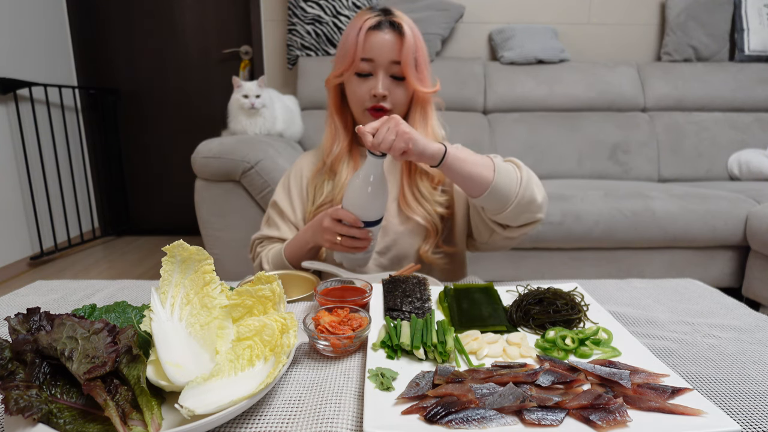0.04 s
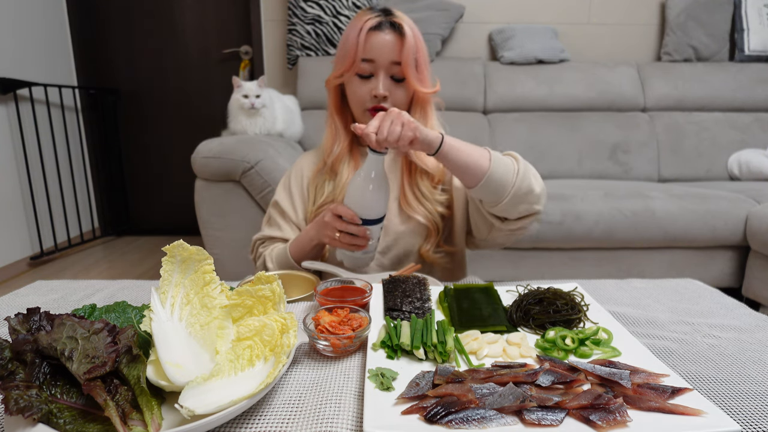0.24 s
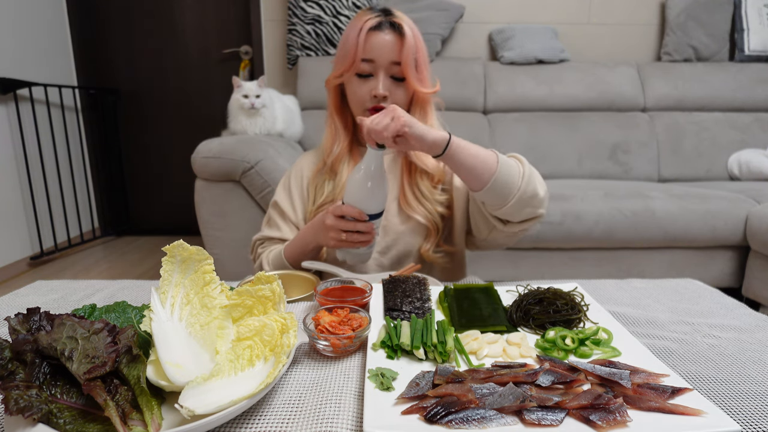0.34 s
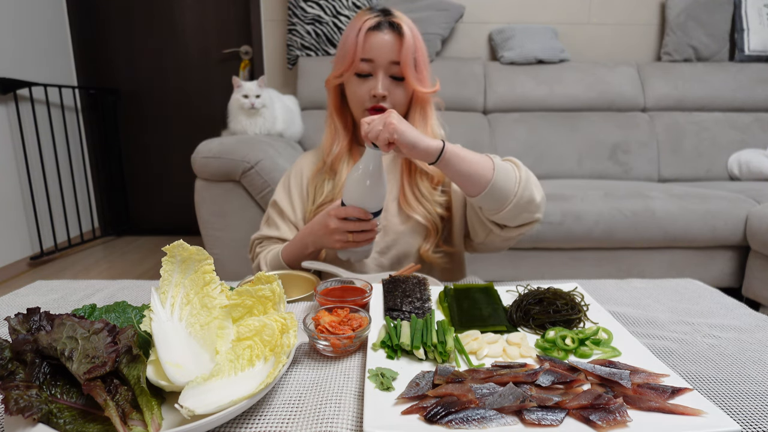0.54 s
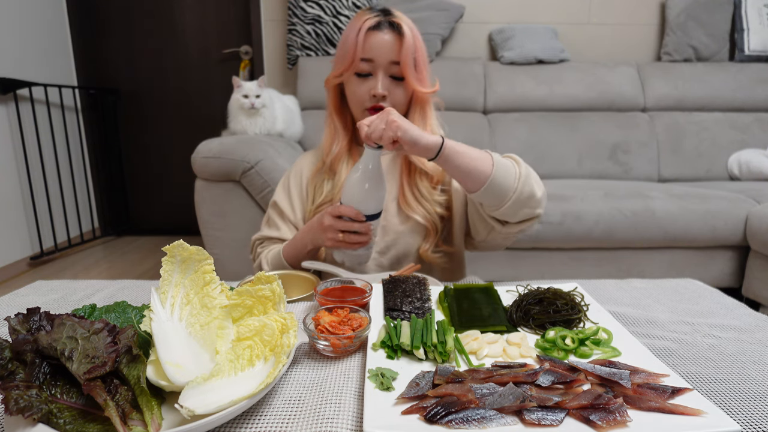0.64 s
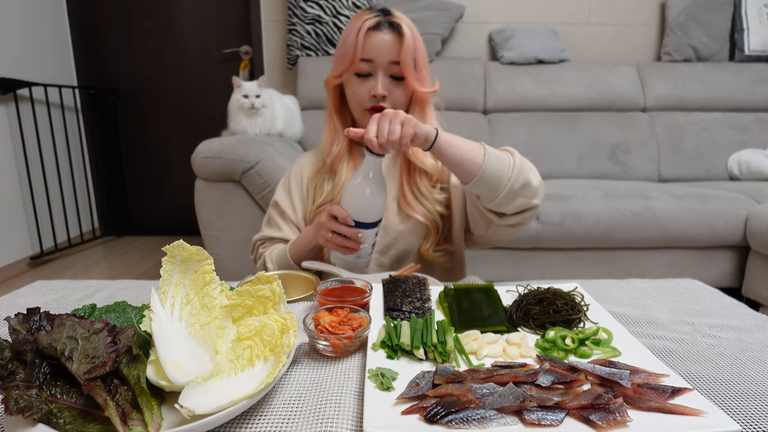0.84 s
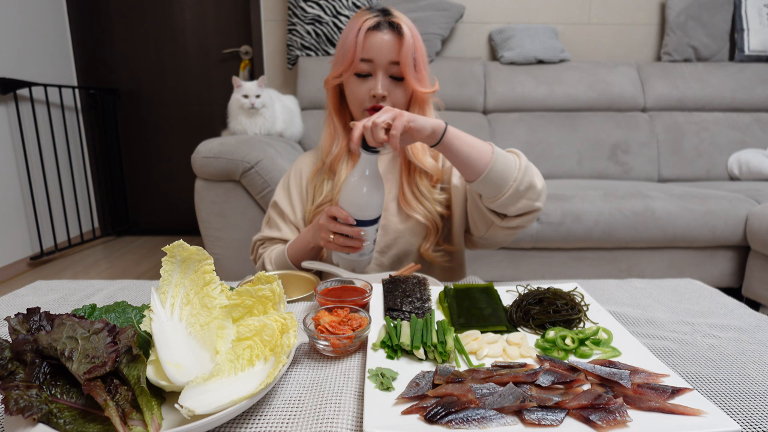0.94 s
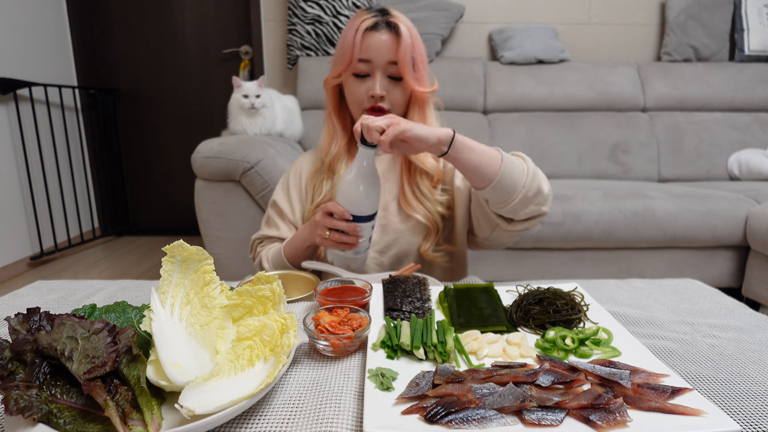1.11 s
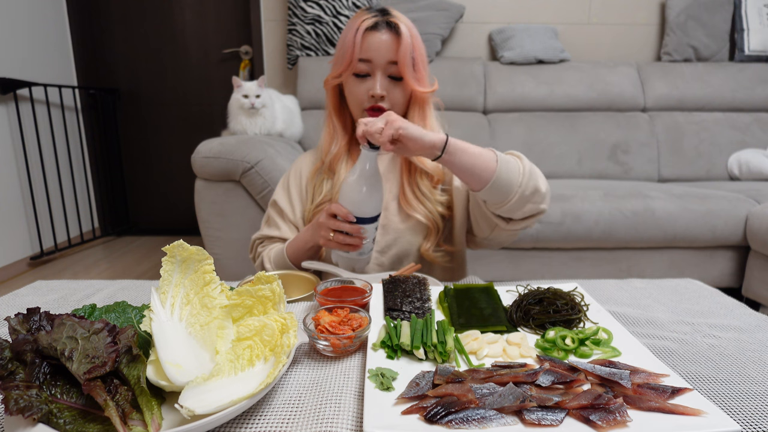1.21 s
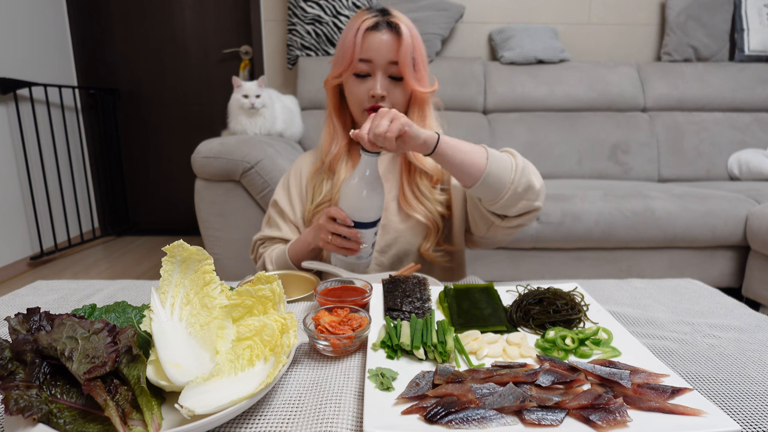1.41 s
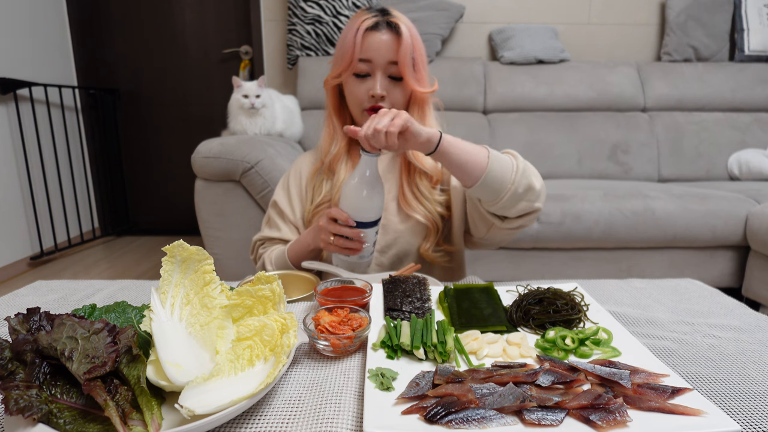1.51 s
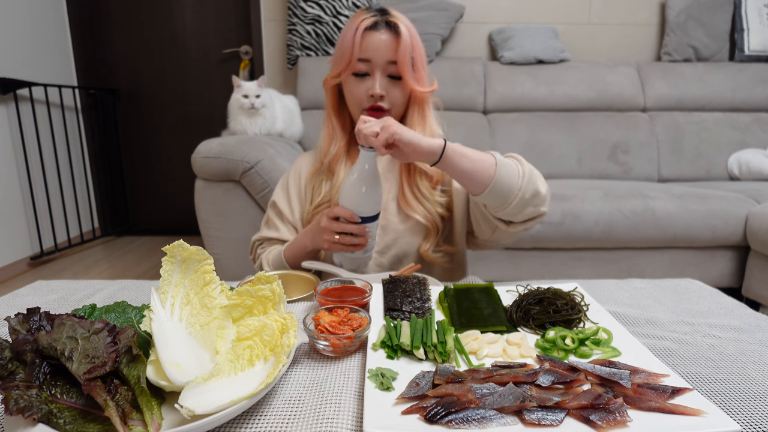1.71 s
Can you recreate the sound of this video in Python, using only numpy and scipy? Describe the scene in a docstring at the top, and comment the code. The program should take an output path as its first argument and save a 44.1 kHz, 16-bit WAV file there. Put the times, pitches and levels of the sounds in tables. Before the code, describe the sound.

Dry clicks of a screw cap easing open on a fizzy bottle, with brief gas hisses.

```python
"""The plastic screw cap of a shaken fizzy bottle is eased open in a living room, over soft steady noise.
The cap sticks and slips on its thread: each slip is a dry snap that rings the cap, bounces off the table
and dies away in the room. One snap comes first, then a little hiss of gas and the rub of the hand.
A quick run of snaps follows. Between the turns the hand shifts its grip and more gas hisses out.
Two more clear snaps come near the end, then a few faint ticks and a last hiss."""
import sys
import numpy as np
from scipy import signal
from scipy.fft import rfft, irfft
from scipy.io import wavfile

SR = 44100
rng = np.random.default_rng(int(sys.argv[2]) if len(sys.argv) > 2 else 0)


def unload_audio(sound):
    """Save the sound as a 16-bit wav file, at the path given as the first command line argument."""
    columns = np.transpose(np.atleast_2d(sound))
    # keep every value between -1 and 1, then stretch to whole-number steps
    steps = np.round(np.clip(columns, -1, 1) * 32767)
    wavfile.write(sys.argv[1], SR, steps.astype(np.int16))


N = 77175   # 1.75 seconds
SNAP_LEAD_S = .002   # each snap swells in this long before its peak


def cap_snaps(chatter, to_room):
    """Each slip makes the cap ring at two pitches, thuds faintly in the bottle and gives a bright crack."""
    # One row per slip. A fade is the time to drop by 60 dB; stereo_width runs from 0 to 1.
    # start_s, pitch_hz, ring_db, low_crack_db, mid_crack_db, high_crack_db, fade_s, stereo_width, room_db
    slips = [(.2256, 2550, -33.5, -31.5, -33, -30.5, 0.013, 0.24, 4.5),
             (0.373, 2900, -44, -44, -58, -56, .03, 0, 4),
             (0.6116, 2920, -35, -28.5, -33, -34, 0.0049, 0, -6),
             (0.6136, 2960, -26, -27.5, -33.5, -34, 0.012, 0.18, 1.5),
             (0.6444, 2690, -26.5, -47, -31.5, -28, 0.011, 0.36, 1),
             (0.6567, 2860, -28.5, -52, -40, -41, 0.009, .5, -0.5),
             (0.6856, 2820, -26.5, -39, -30.5, -30.5, 0.014, 0.1, -1),
             (0.7037, 3080, -39.5, -38.5, -27, -29, 0.0089, 0.5, -4),
             (0.7192, 2870, -37, -48, -48, -29.5, 0.0063, 0.7, -6),
             (0.7563, 2530, -28, -39, -26.5, -29.5, 0.013, 0.3, -0.5),
             (0.771, 2650, -43.5, -43, -35, -41, .025, .4, -1),
             (.8215, 3030, -28.5, -30, -27.5, -26.5, 0.014, .7, -0.5),
             (0.8421, 2600, -39, -46, -27.5, -34, 0.017, 0.46, -2.5),
             (1.2397, 2470, -57, -50, -42.5, -43, 0.0068, 0.06, -6),
             (1.2673, 3030, -50.5, -63, -37, -41, 0.0046, 0, -4),
             (1.3712, 2660, -27, -34.5, -27.5, -22, 0.012, 0.04, 1),
             (1.4643, 2700, -35.5, -42, -32.5, -32, 0.015, 0.28, -2.5),
             (1.5705, 2700, -55, -56, -49, -54, 0.022, 0.2, -1),
             (1.576, 2630, -43, -52, -48, -51, 0.019, 0, -4),
             (1.668, 2970, -56, -60.5, -45.5, -62, 0.014, 0.1, -2)]
    # The low, middle and high parts of the crack: low_hz, high_hz
    crack_bands = [(5200, 7600), (7500, 11370), (11700, 15500)]
    ring_width_hz, crack_boost_db = 793, 1
    snap_gain = np.sqrt(2 * .004 * SR)   # turns energy into a level over 4 ms in two channels
    out = np.zeros((2, N))
    for start_s, pitch_hz, ring_db, *crack_dbs, fade_s, width, room_db in slips:
        force = slip_force(fade_s, chatter * 0.57, width)
        ring = resonance(force, pitch_hz, ring_width_hz)
        ring = energy_one(resonance(ring, pitch_hz, 2 * ring_width_hz))
        overtone = from_db(-17) * energy_one(resonance(force, pitch_hz=3860, width_hz=410))
        thud = from_db(-45) * energy_one(band(force, 25, 300))
        snap = from_db(ring_db) * (band(ring + overtone, 1610, 8000) + thud)
        for (low_hz, high_hz), crack_db in zip(crack_bands, crack_dbs):
            crack = band(slip_force(fade_s, chatter, width), low_hz, high_hz)
            snap += from_db(crack_db + crack_boost_db) * energy_one(crack)
        add(out, start_s - SNAP_LEAD_S, snap * snap_gain * from_db(room_db if to_room else 0))
    return out


def slip_force(fade_s, chatter, width):
    """One slip: a brief rise of noise, a sharp break, then a tiny rattle (chatter) that dies fast."""
    rise_s = 0.0024   # time to rise by 60 dB
    break_at = int(SNAP_LEAD_S * SR)
    t = (np.arange(SR // 40) - break_at) / SR
    mid, side = rng.standard_normal((2, len(t)))
    loudness = from_db(60 * np.where(t < 0, t / rise_s, -t / fade_s))
    force = chatter * left_right(mid, width * side) * loudness
    force[:, break_at] = 2
    return force * rng.choice([-1, 1])


def gas_hiss():
    """Gas squeezes through the thread in short hisses as the seal opens, holds and closes."""
    # Spurts of gas: start_s, length_s, level_db
    spurts = [(0.362, 0.1, -43), (.935, 0.029, -45.5), (1.156, 0.039, -51), (1.237, .04, -47.5),
              (1.567, .063, -48.5)]
    # How strong the hiss is from low to high: frequency_hz, level_db
    tone = [(700, -27.5), (1100, -9), (2000, -17), (2900, 3.5), (4000, -5), (6500, -11), (8400, 6.5),
            (10000, 0.5), (15500, 2)]
    open_s, close_s = 0.018, 0.016
    t = np.arange(N) / SR
    flow = np.zeros(N)
    for start_s, length_s, level_db in spurts:
        opening = np.clip((t - start_s) / open_s, 0, 1)
        closing = np.exp(-np.maximum(t - start_s - length_s, 0) / close_s)
        flow += from_db(level_db) * opening * closing
    return flow * stereo_noise(tone, likeness=1)


def hand_rub():
    """Soft rubbing swells and fades as the hand shifts its grip."""
    # Shifts of the grip: peak_s, length_s, level_db
    grips = [(0.393, 0.07, -53), (0.547, .04, -55.5), (0.96, .1, -57.5), (1.248, 0.18, -53.5)]
    # How strong the rubbing is from low to high: frequency_hz, level_db
    tone = [(100, -45), (300, -20), (750, -14), (1000, 7), (1600, 1.5), (2400, 3.5), (4000, -13),
            (12000, -23)]
    t = np.arange(N) / SR
    swells = sum(from_db(level_db) * np.exp(-2 * ((t - peak_s) / length_s) ** 2)
                 for peak_s, length_s, level_db in grips)
    return swells * stereo_noise(tone, likeness=0.74)


def near_echoes(sound):
    """The high part of the sound bounces off the table and other things close by."""
    # One row per bounce: delay_s, level_db
    echoes = [(.0081, -24.5), (.0094, -11.5)]
    keep_highs = signal.butter(1, 4000, "high", fs=SR, output="sos")
    bright = signal.sosfilt(keep_highs, sound + 1e-18)
    out = np.zeros((2, N))
    for delay_s, level_db in echoes:
        add(out, delay_s, from_db(level_db) * bright)
    return out


def room_tail(sound):
    """Many echoes from the room blur into a tail that builds quickly; its highest part dies first."""
    # The room's tail from low to high: frequency_hz, level_db, fade_s (time to drop by 60 dB)
    room = [(1200, 4.5, 1), (2760, -4.5, 0.51), (4640, -0.5, 0.88), (6430, -1, 0.48), (9100, -5.5, 0.44),
            (15000, -4.5, 0.32)]
    delay_s, build_s, likeness = 0.0014, 0.0081, 0.62
    t = np.arange(SR // 2) / SR
    hz = np.arange(len(t) // 2 + 1) * SR / len(t)
    mid, side = rng.standard_normal((2, len(t)))
    spectrum = rfft(left_right(np.sqrt((1 + likeness) / 2) * mid, np.sqrt((1 - likeness) / 2) * side))
    build = 1 - np.exp(-np.maximum(t - delay_s, 0) / build_s)
    edges_hz = np.geomspace(600, 18000, 15)
    tail = 0
    for low_hz, high_hz in zip(edges_hz, edges_hz[1:]):
        centre_hz = np.sqrt(low_hz * high_hz)
        fade_s = at_hz(room, centre_hz, column=2)
        loudness = energy_one(build * from_db(-60 * t / fade_s))
        noise = irfft(spectrum * ((hz >= low_hz) & (hz < high_hz)), len(t))
        tail = tail + from_db(at_hz(room, centre_hz)) * loudness * noise
    return signal.fftconvolve(sound[None], tail, axes=1)[:, :N]


def room_noise():
    """The soft, steady noise of the living room."""
    # How strong the noise is from low to high: frequency_hz, level_db
    tone = [(30, -46), (70, -31.5), (130, -25), (230, -14), (320, -12.5), (410, -7.5), (540, -14.5),
            (760, -15), (980, -1), (1500, -0.5), (2200, -4), (3500, -8), (6000, -10.5), (10000, -11),
            (15500, -14)]
    # How alike left and right are: frequency_hz, likeness (0 to 1)
    likeness = [(60, 0.98), (250, 0.87), (600, 0.7), (4000, 0.46), (12000, 0.71)]
    return from_db(-49.5) * stereo_noise(tone, likeness)


def stereo_noise(tone, likeness):
    """Noise with the given tone and an average power of 1; likeness 1 makes left and right the same."""
    hz = np.arange(N // 2 + 1) * SR / N
    mid, side = rfft(rng.standard_normal((2, N)))
    alike = at_hz(likeness, hz) if np.ndim(likeness) else likeness
    spectrum = left_right(np.sqrt(1 + alike) * mid, np.sqrt(1 - alike) * side)
    noise = irfft(spectrum * from_db(at_hz(tone, hz)), N)
    return noise / np.sqrt(np.mean(noise ** 2) + 1e-20)


def resonance(x, pitch_hz, width_hz):
    """Ring at one pitch; the larger the width, the sooner the ring dies."""
    decay = np.exp(-np.pi * width_hz / SR)
    feedback = [1, -2 * decay * np.cos(2 * np.pi * pitch_hz / SR), decay * decay]
    return signal.lfilter([1, 0, -1], feedback, x)


def band(x, low_hz, high_hz):
    """Keep the part of a sound between two frequencies."""
    return signal.sosfilt(signal.butter(2, [low_hz, high_hz], "band", fs=SR, output="sos"), x)


def at_hz(table, hz, column=1):
    """Look up a frequency in a table, sliding between rows on a scale of octaves."""
    table = np.array(table)
    return np.interp(np.log(np.maximum(hz, 1)), np.log(table[:, 0]), table[:, column])


def left_right(mid, side):
    """Make two channels: both share mid, and side sets them apart."""
    return np.array([mid + side, mid - side])


def from_db(db):
    """Turn decibels into a number to multiply by."""
    return 10 ** (np.asarray(db) / 20)


def energy_one(x):
    """Scale a sound so that its total energy is 1."""
    return x / np.sqrt(np.sum(x ** 2) + 1e-20)


def add(out, start_s, x):
    """Mix x into out, beginning at start_s."""
    i = int(start_s * SR)
    out[:, i:i + x.shape[1]] += x[:, :N - i]


def scene():
    """Cap, gas and hand are straight ahead, with the room all around."""
    direct = cap_snaps(chatter=0.32, to_room=False)
    outward = cap_snaps(chatter=0.2, to_room=True)   # the room gets mostly the clean break
    echoes = near_echoes(outward) + room_tail(outward.mean(axis=0))
    return direct + echoes + gas_hiss() + hand_rub() + room_noise()


def record(dry):
    """Cut away the very highest sounds steeply."""
    cutoff_hz = 16100
    return signal.sosfilt(signal.ellip(10, .2, 70, cutoff_hz, fs=SR, output="sos"), dry)


dry = scene()
out = record(dry)
unload_audio(out)
```